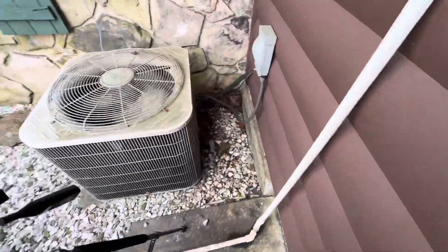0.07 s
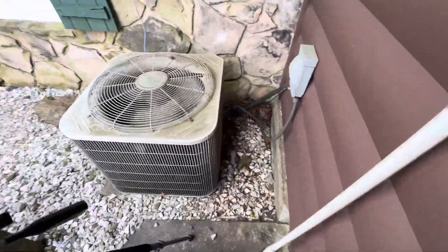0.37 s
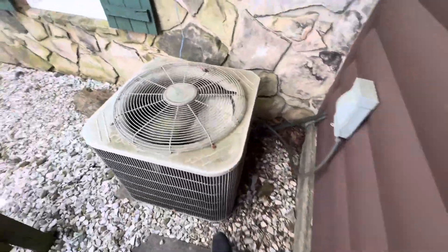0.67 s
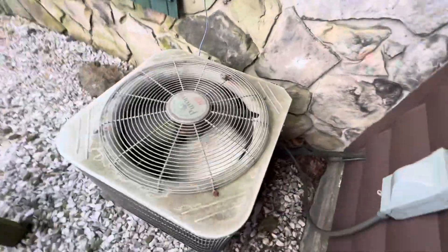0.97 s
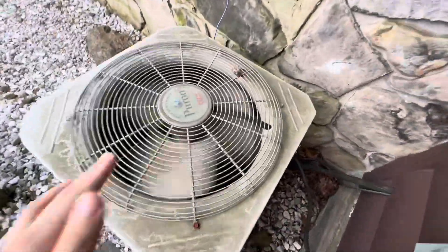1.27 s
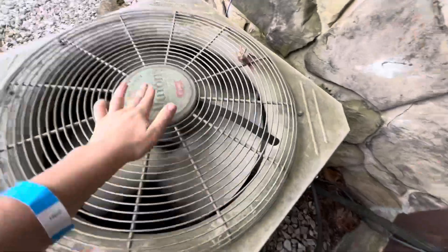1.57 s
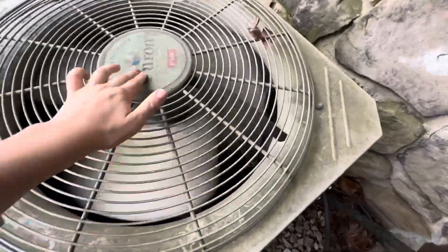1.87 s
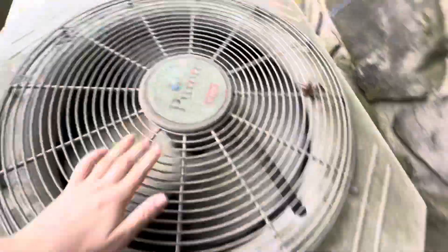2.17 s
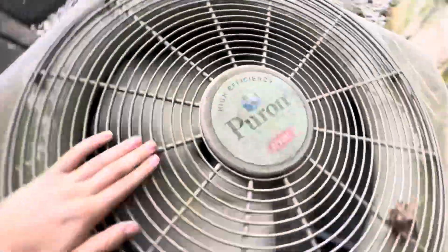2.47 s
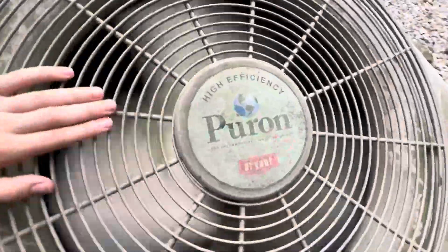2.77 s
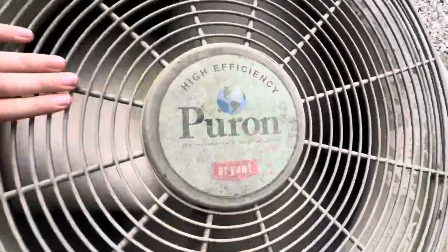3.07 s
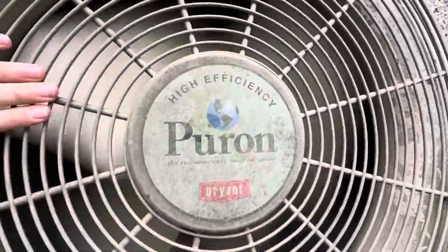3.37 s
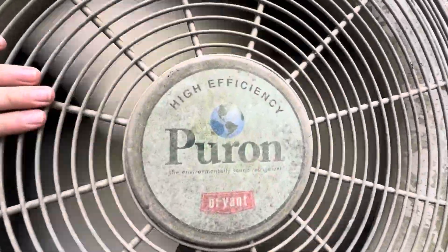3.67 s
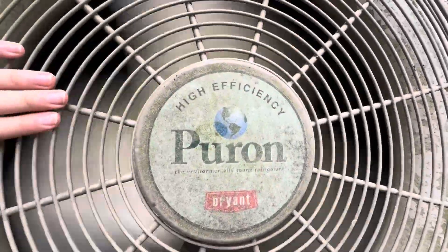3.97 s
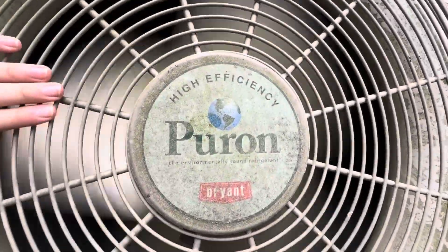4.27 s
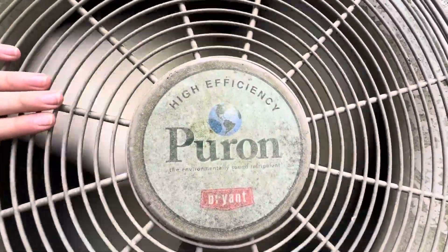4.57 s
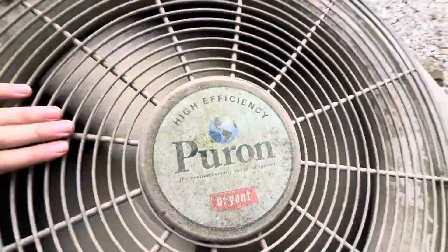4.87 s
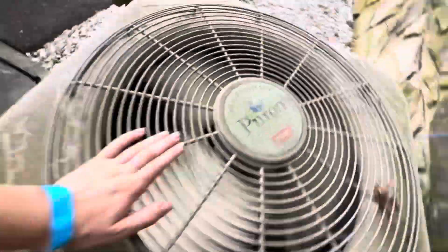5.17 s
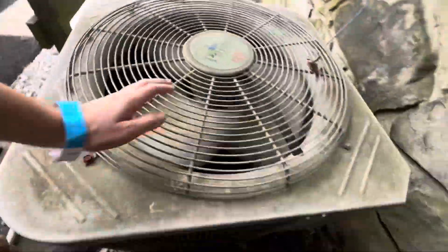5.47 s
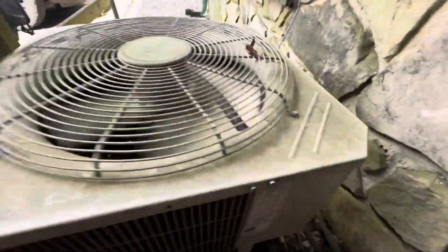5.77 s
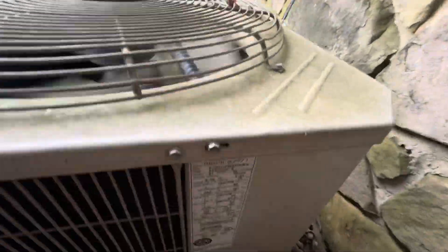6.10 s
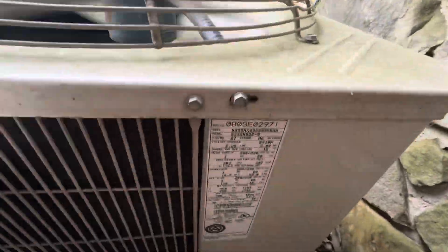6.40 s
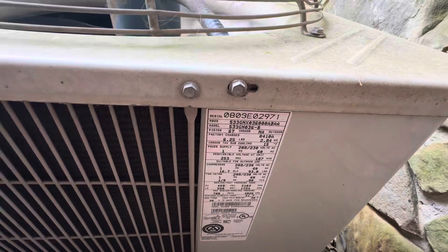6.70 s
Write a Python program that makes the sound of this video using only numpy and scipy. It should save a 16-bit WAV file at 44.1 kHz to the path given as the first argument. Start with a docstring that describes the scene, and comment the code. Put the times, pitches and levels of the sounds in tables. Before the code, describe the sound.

An outdoor air conditioner runs throughout, heard close on a hand-held microphone: low motor and compressor hum, fan blade drone, air hissing through the grille and a faint ring of metal panels. From about 0.8 to 2.3 seconds the exhaust buffets the microphone with irregular low thumps and flutter, strongest at first and mostly on the left. Short ticks fall among the gusts, with a brief gritty scrunch near 0.9 seconds and a tiny finger squeak just before 2. Faint, thin, high chirps come between 2.6 and 3.1 seconds. From 3 to 5 seconds the fan's rush and hum are fuller and steady, with a slight whine and one faint scrunch near 4.8. A second, shorter spell of buffeting with a tick lasts from 5.2 to 5.7 seconds. A soft hollow rush passes around 6, and the compressor's higher tones come forward until the end, near 7 seconds.

```python
"""An outdoor air conditioner runs beside a stone wall; a hand-held microphone passes over its fan
and down its side. Motor and compressor hum, three blades drone, air rushes through the grille and
panels ring. The rising exhaust buffets the two microphone ports on the way in and out.
A slipping finger squeaks; short ringing ticks, gritty scrunches and faint chirps are also heard."""
import sys
import numpy as np
from scipy import signal
from scipy.fft import rfft, irfft
from scipy.io import wavfile

SR = 44100
rng = np.random.default_rng(int(sys.argv[2]) if len(sys.argv) > 2 else 0)


def pcm_store(signal):
    """Save signal as 16-bit PCM."""
    levels = np.round(np.clip(np.atleast_2d(signal), -1, 1) * 32767)
    wavfile.write(sys.argv[1], SR, levels.astype(np.int16).T)


N = 306054
TIME_S = np.arange(N) / SR
FREQS_HZ = np.maximum(np.arange(N // 2 + 1) * SR / N, 1)
COMPRESSOR_HZ, BLADE_PASS_HZ, MAINS_HZ, CUTOFF_HZ = 58.76, 81.4, 60.0, 11800

# low sound along the path; drives rumble, hum and blade tones: (time [s], level [dB])
LOW_PATH = [(0, -38.5), (.72, -37), (1.3, -44.5), (2.35, -46.5), (2.93, -40.5), (3.03, -33.5), (5.2, -31.5),
            (5.62, -35), (5.76, -42.5), (6.22, -42.5), (6.3, -34), (6.94, -33)]
# nearness to blades and grille: (time [s], rush [dB], hiss [dB])
RUSH_PATH = [(0.0, -46, -46.5), (2.1, -41.5, -48), (2.85, -41.5, -46.5), (3.2, -37.5, -45.5),
             (4.8, -37.5, -44), (5.8, -44.5, -47), (6.94, -40, -44.5)]
# air noise colour: (frequency [Hz], left [dB], right [dB])
AIR_SPECTRUM = [(27, -19, -28), (39, 7, 10), (83.4, 10, 8), (199, -2, 4.5), (373, -7.5, 0.5),
                (626, -13, -9.5), (860, -9.5, -6), (1230, -11, -11), (2010, -14, -11), (2450, -19, -14.5),
                (2880, -36, -14), (3680, -23, -21.5), (4040, -22, -18.5), (5660, -29, -27.5),
                (6270, -25.5, -25), (7340, -35, -35), (8180, -27.5, -19), (9770, -45, -21),
                (10810, -64, -30.5), (12770, -70, -58.5)]
# coherence of the ports: (frequency [Hz], in-phase part [1], left-leading quadrature part [1])
PORT_COHERENCE = [(70, 0.12, -0.63), (260, 0.85, -0.23), (850, 0.32, 0.57), (1400, 0.34, 0.3),
                  (2100, -0.2, -0.23), (2850, -0.34, 0.32), (4300, 0.34, -0.32), (5000, -0.58, 0.44),
                  (5500, -0.53, 0.09), (5900, 0.5, -0.36), (6750, 0.86, 0.1), (7170, -0.8, -0.01),
                  (7600, 0.37, -0.3), (8300, -0.5, 0.02)]
# blade-pass tones: (multiple [1], left [dB], right [dB])
BLADE_LINES = [(1, -35.5, -37.5), (2, -45, -41.5), (5, -57, -53)]
# sheet metal and grille modes: (frequency [Hz], width [Hz], level [dB], left-right [dB], slope [dB/s])
PANEL_MODES = [(2146, 49, -58, -7.5, 0.7), (2927, 74, -56.5, 1.5, 0), (3220, 69, -63, -2, 1.07)]
# ringing rush of the coil: (time [s], level [dB])
COIL_PATH = [(0, -47.5), (2.4, -56)]
# whine of the fan opening, strongest above it: (time [s], level [dB])
OPENING_PATH = [(0, -53), (.32, -46.5), (.65, -55), (2.8, -55), (3.15, -44.5), (4.7, -45.3), (5.3, -49.5)]
# motor hum: (multiple [1], starting gain on the low sound [dB], slope [dB/s])
MOTOR_LINES = [(2, -13.5, 0.8), (4, -5, -1.5)]
# compressor tones: (shaft multiple [1], left [dB], right [dB], gain beside the casing [dB])
COMPRESSOR_LINES = [(6, -52, -42.5, -1.5), (11, -56, -53, 0), (13, -57, -57, 0), (17, -49.5, -50, -1),
                    (21, -57.5, -59, 4), (25, -60, -57, 6), (26, -58, -57, 2), (29, -59, -56, -1),
                    (30, -61, -57, 0), (33, -63, -59, 5), (36, -65, -59, 5), (37, -66, -61, 5),
                    (49, -65, -62, 4), (50, -61, -57, -5), (55, -70, -63, 2), (69, -69, -64, 5)]
# nearness to the compressor: (time [s], gain [dB], beside the casing [0-1])
COMPRESSOR_PATH = [(2.5, -3.5, 0), (3.2, 0, 0), (5.1, 0, 0), (5.9, 0, 1)]
# passes through the exhaust: (start [s], end [s], entry level [dB], fade [dB/s])
EXHAUST_CROSSINGS = [(0.766, 2.258, -19.5, 7), (5.24, 5.68, -18.5, 25)]
# colour of the turbulence between eddies: (frequency [Hz], level [dB])
EXHAUST_SPECTRUM = [(25, -13), (60, 7.5), (140, -10.5), (260, -11.5), (600, -31.5), (2000, -82)]
# eddies on the ports: (time [s], half length [s], thump [dB], left-right [dB], flutter [dB])
EDDIES = [(0.781, 0.016, -7.5, 0.5, -28), (0.814, 0.005, -3, 3, -21.5), (0.829, 0.018, -15, 11, -34),
          (0.863, 0.013, -18, -9, -33), (0.977, 0.041, -24, 0, -42), (1.018, 0.0054, -6.5, 8, -30.5),
          (1.034, 0.003, -7.5, -2, -54), (1.069, 0.0046, -9, 6, -46), (1.121, 0.012, -14.5, 7, -54),
          (1.196, 0.015, -17, 8, -35), (1.283, 0.0036, -17, 17.5, -31), (1.437, 0.0084, -28, 19.5, -32),
          (1.497, 0.0079, -19.5, 12, -31), (1.627, 0.007, -21, 13, -27.5),
          (1.643, 0.0044, -17.5, 13, -23.5), (1.693, 0.013, -23.5, 6, -35), (1.784, 0.0073, -24.5, 16, -34),
          (1.847, 0.047, -23.5, 4, -31), (1.928, 0.026, -23, 3, -40), (2.06, 0.07, -28, 4, -38.5),
          (2.267, 0.0056, -27.5, 7, -59), (4.51, 0.02, -30, 1, -55), (5.038, 0.016, -31.5, 7, -55),
          (5.247, 0.0079, -7, 10.5, -29.5), (5.329, 0.016, -16, 1, -50), (5.358, 0.0053, -18, 17, -33),
          (5.448, 0.015, -13.5, -0.5, -30), (5.494, 0.01, -20, -1, -49), (5.577, 0.011, -28.5, -3, -35.5),
          (5.662, 0.0096, -21, 3, -38)]
# colour of an eddy's pressure: (frequency [Hz], level [dB])
THUMP_SPECTRUM = [(20, -40), (35, 7.5), (60, 2), (160, 1.5), (280, -8), (420, -12), (600, -38.5),
                  (1200, -81)]
# colour of the flutter at its edge: (frequency [Hz], level [dB])
FLUTTER_SPECTRUM = [(300, 11), (600, 9.5), (1200, 8), (1700, -1.5), (2400, -10.5), (6000, -49)]
# short ringing ticks and knocks: (time [s], peak [dB], ring [Hz], t60 [s], left-right [dB])
TICKS = [(.847, -20, 1480, 0.0088, -8), (1.265, -21.5, 1020, 0.0067, -3), (1.777, -27, 1080, .008, 10),
         (1.842, -22, 1250, 0.0074, 7), (1.915, -27, 1040, 0.0086, 5), (1.953, -22, 2550, 0.003, 11),
         (1.9535, -18, 757, 0.014, 18), (5.352, -19, 1090, 0.0047, -8)]
# gritty scrunches: (time [s], level [dB], decay [s], left-right [dB])
SCRUNCHES = [(.9305, -20, .0016, -9), (.9363, -30, .003, -8), (.939, -33.5, .011, -7),
             (4.765, -43, .018, -9)]
# scrunch colour: (frequency [Hz], level [dB])
SCRUNCH_SPECTRUM = [(700, -19), (2000, 22.5), (4200, 21.5), (6500, 11), (9300, 27.5), (11500, -1),
                    (13000, -19)]
# finger slip: (time [s], length [s], peak [dB], start pitch [Hz], end pitch [Hz], left-right [dB])
FINGER_SLIP = (1.9528, .0046, -11.5, 1520, 980, 19)
# thin chirps near two pitches: (time [s], pitch [Hz], peak [dB])
CHIRP_NOTES = [(2.61, 4570, -54), (2.72, 4610, -48), (2.731, 4060, -50.5), (2.828, 4060, -48),
               (2.872, 4600, -52), (2.885, 4020, -49), (2.985, 4050, -49), (3.072, 4580, -50)]
# rush at the rim: (time [s], half length [s], level [dB], centre [Hz], width [Hz], glide [Hz/s])
RIM_RUSH = (5.95, .19, -46, 1530, 150, -500)


def from_db(db):
    """Decibels to gain."""
    return 10 ** (np.asarray(db) / 20)


def panned(pan_db):
    """Left and right gains."""
    return from_db([[pan_db / 2], [-pan_db / 2]])


def unit_rms(x):
    """Scale to unit rms."""
    return x / np.sqrt(np.mean(x ** 2) + 1e-20)


def bell(x):
    """Gaussian, 1/e at x = 1."""
    return np.exp(-np.minimum(abs(x), 10) ** 2)


def over_time(rows):
    """Each column of a path at every sample."""
    times_s, *columns = np.transpose(rows)
    return np.array([np.interp(TIME_S, times_s, c) for c in columns])


def over_frequency(rows):
    """Each column of a spectrum at every bin."""
    hz, *columns = np.transpose(rows)
    return np.array([np.interp(np.log(FREQS_HZ), np.log(hz), c) for c in columns])


def drift(rate_hz):
    """Smooth random wander of unit spread."""
    hop, settle = 100, 1000
    pole = np.exp(-2 * np.pi * rate_hz * hop / SR)
    white = rng.standard_normal(N // hop + settle + 2)
    slow = signal.lfilter([1], [1, -2 * pole, pole * pole], white)[settle:]
    return np.interp(np.arange(N) / hop, np.arange(len(slow)), unit_rms(slow - slow.mean()))


def coloured(spectrum, coherence):
    """Shaped stereo noise, partly shared by the ports."""
    shared, own = rng.standard_normal(N), rng.standard_normal((2, N))
    white = np.sqrt(coherence) * shared + np.sqrt(1 - coherence) * own
    return unit_rms(irfft(rfft(white) * from_db(over_frequency(spectrum)), N))


def resonance(hz, width_hz):
    """Stereo noise in one narrow resonance."""
    white = rfft(rng.standard_normal((2, N)))
    return unit_rms(irfft(white / (1 + (2 * (FREQS_HZ - hz) / width_hz) ** 2), N))


def levelled(x, window_s):
    """Hold the short-term rms near 1."""
    window = np.hanning(int(window_s * SR))
    power = signal.fftconvolve(x ** 2, [window / window.sum()], mode="same")
    return x / np.sqrt(np.maximum(power, 1e-9))


def buzz(base_hz):
    """Spectrum of random harmonics, at the power density of unit white noise."""
    lines = np.zeros((2, len(FREQS_HZ)), complex)
    bins = np.round(np.arange(base_hz, CUTOFF_HZ, base_hz) * N / SR).astype(int)
    lines[:, bins] = rng.standard_normal((2, len(bins))) + 1j * rng.standard_normal((2, len(bins)))
    return lines * N * np.sqrt(base_hz / SR / 2)


def harmonics(base_hz, lines, waver_db, waver_hz, wander_rad, left_lead_s=0):
    """Tones of a rotating part; level and phase wander as when moving through wall reflections."""
    out = np.zeros((2, N))
    for multiple, left_db, right_db in lines:
        hz = multiple * base_hz
        phase = 2 * np.pi * (hz * TIME_S + rng.random()) + wander_rad * drift(1.07)
        swell = np.sqrt(2) * from_db(waver_db * drift(waver_hz))
        out[0] += swell * from_db(left_db) * np.sin(phase + 2 * np.pi * hz * left_lead_s)
        out[1] += swell * from_db(right_db) * np.sin(phase)
    return out


def air(low_db, rush_db, hiss_db, rumble_edge_hz=424, hiss_edge_hz=1925):
    """Turbulence: rumble in the stream, rush off the blades, hiss at the grille wires."""
    right, own = rfft(rng.standard_normal((2, N)))
    in_phase, quadrature = over_frequency(PORT_COHERENCE)
    coherence = in_phase + 1j * quadrature
    left = coherence * right + np.sqrt(np.maximum(1 - abs(coherence) ** 2, 0)) * own
    compressor_rasp = from_db(-8.5) * buzz(COMPRESSOR_HZ) * (FREQS_HZ > rumble_edge_hz)
    motor_buzz = from_db(-20) * buzz(2 * MAINS_HZ) * (FREQS_HZ > 2 * hiss_edge_hz)
    noise = (np.array([left, right]) + compressor_rasp + motor_buzz) * from_db(over_frequency(AIR_SPECTRUM))
    low = 1 / (1 + (FREQS_HZ / rumble_edge_hz) ** 6)
    high = 1 - 1 / (1 + (FREQS_HZ / hiss_edge_hz) ** 6)
    rumble, rush, hiss = [unit_rms(irfft(noise * band, N)) for band in (low, 1 - low - high, high)]
    motor_pull = 1 + 0.031 * np.sin(4 * np.pi * MAINS_HZ * TIME_S)   # two pulses per mains cycle
    rush *= from_db(rush_db + 0.7 * drift(8))
    hiss *= from_db(hiss_db + 0.5 * drift(8)) * motor_pull
    rumble *= from_db(low_db - 2.5 + 1.46 * drift(8)) * panned(-2.5)
    return rumble + rush + hiss


def blades(low_db, nearness_db):
    """Blade-pass tones swell with the low sound and with nearness to the fan."""
    gain_db = -5.5 + 0.96 * (low_db - low_db.mean()) + 0.45 * nearness_db
    return from_db(gain_db) * harmonics(BLADE_PASS_HZ, BLADE_LINES, waver_db=2.2, waver_hz=8,
                                        wander_rad=0.34, left_lead_s=-0.0017)


def panels(nearness_db):
    """The machine shakes sheet metal and grille at their resonances."""
    out = 0
    for hz, width_hz, db, pan_db, db_per_s in PANEL_MODES:
        rattle_db = 2.4 * drift(12)
        gain = from_db(db + db_per_s * TIME_S + rattle_db + 0.2 * nearness_db)
        out += gain * panned(pan_db) * resonance(hz, width_hz)
    return out


def coil():
    """Ringing rush of the coil, heard beside the unit."""
    return from_db(over_time(COIL_PATH)) * resonance(hz=1570, width_hz=210)


def opening_whine(hz=22 * COMPRESSOR_HZ, rough_db=2.5):
    """One compressor line rings in the fan opening; rushing air roughens it into a band."""
    port_phase_rad = np.array([[1], [0]])
    tone = np.sqrt(2) * np.sin(2 * np.pi * hz * TIME_S + drift(2.1) / 2 + port_phase_rad)
    roughness = from_db(rough_db) * resonance(hz, width_hz=115)[0]
    return from_db(over_time(OPENING_PATH)) * unit_rms(tone + roughness)


def motor_hum(low_db, left_db=-2, right_db=1):
    """The motor hums on the mains; the compressor slips behind it, so the two beat."""
    out = 0
    for multiple, db, db_per_s in MOTOR_LINES:
        gain = from_db(low_db + db + db_per_s * TIME_S)
        line = [(multiple, left_db, right_db)]
        for base_hz in (MAINS_HZ, COMPRESSOR_HZ):
            out += gain * harmonics(base_hz, line, waver_db=1, waver_hz=8.6, wander_rad=0.22)
    return out


def compressor():
    """Shaft harmonics grow on approach; most upper ones come forward beside the casing."""
    gain_db, beside = over_time(COMPRESSOR_PATH)
    lines = [(multiple, left_db + beside * side_db, right_db + beside * side_db)
             for multiple, left_db, right_db, side_db in COMPRESSOR_LINES]
    return from_db(gain_db) * harmonics(COMPRESSOR_HZ, lines, waver_db=2.1, waver_hz=2.7,
                                        wander_rad=0.45, left_lead_s=0.00018)


def exhaust(edge_s=0.022, gain_db=-3.5, windward_db=5):
    """The stream rumbles on the ports while they are inside it; the left one faces it."""
    envelope = 0
    for start_s, end_s, entry_db, fade_db_per_s in EXHAUST_CROSSINGS:
        inside = (np.tanh((TIME_S - start_s) / edge_s) - np.tanh((TIME_S - end_s) / edge_s)) / 2
        fade_db = fade_db_per_s * np.clip(TIME_S - start_s, 0, end_s - start_s)
        envelope += inside * from_db(entry_db - fade_db + gain_db)
    rumble = levelled(coloured(EXHAUST_SPECTRUM, coherence=0.21), window_s=0.065)
    return envelope * panned(windward_db) * rumble


def falling(x, lag_cycles=0.794, undelayed_hz=212.5):
    """Lower swings arrive later, so each thump drops in pitch."""
    turns = lag_cycles * (np.log(FREQS_HZ) - FREQS_HZ / undelayed_hz)
    return irfft(rfft(x) * np.exp(-2j * np.pi * turns), N)


def slosh(hz=564, half_width_hz=220):
    """Air swings in at one port and out at the other: a hollow ring in antiphase."""
    ring = irfft(rfft(rng.standard_normal(N)) * bell((FREQS_HZ - hz) / half_width_hz), N)
    return unit_rms(np.array([ring, -ring]))


def buffeting(wake_s=0.031, wake_db=-15.5, slosh_db=-18, flutter_lead_s=0.0046, flutter_rise_s=0.0052):
    """Each eddy thumps and trails a weaker wake; fast ones flutter at the port's edge."""
    thump_power, flutter_power = np.zeros((2, N)), np.zeros(N)
    for at_s, half_s, db, pan_db, flutter_db in EDDIES:
        near = abs(TIME_S - at_s) < 0.25
        age_s = TIME_S[near] - at_s
        span_s = half_s * np.where(age_s < 0, 0.75, 1)   # arrives faster than it leaves
        wake = from_db(wake_db) ** 2 * (age_s > 0) * np.exp(-abs(age_s) / wake_s)
        thump_power[:, near] += (from_db(db) * panned(pan_db)) ** 2 * (bell(age_s / span_s) + wake)
        flutter_age_s = age_s + flutter_lead_s
        flutter_span_s = np.where(flutter_age_s < 0, flutter_rise_s, half_s + flutter_lead_s)
        flutter_power[near] += from_db(flutter_db) ** 2 * bell(flutter_age_s / flutter_span_s)
    pressure = levelled(coloured(THUMP_SPECTRUM, coherence=0.39), window_s=0.016)
    thump = falling(np.sqrt(thump_power) * pressure)
    flutter = np.sqrt(flutter_power) * coloured(FLUTTER_SPECTRUM, coherence=0.047) * from_db(drift(180))
    hollow = from_db(slosh_db) * np.sqrt(thump_power.mean(axis=0)) * slosh()
    return thump + flutter + hollow


def ticks(rise_s=0.00011):
    """Short ringing ticks and knocks, several at the peaks of gusts."""
    out = 0
    for at_s, db, hz, t60_s, pan_db in TICKS:
        age_s = np.clip(TIME_S - at_s, 0, 0.1)
        envelope = (1 - np.exp(-age_s / rise_s)) * from_db(-60 * age_s / t60_s)
        ring = envelope * np.sin(2 * np.pi * hz * age_s)
        out += from_db(db) * panned(pan_db) * ring / abs(ring).max()
    return out


def scrunches(grain_db=3):
    """Short bright bursts, as of gravel shifting underfoot."""
    envelope = 0
    for at_s, db, decay_s, pan_db in SCRUNCHES:
        decay = (TIME_S > at_s) * np.exp(-np.minimum(abs(TIME_S - at_s) / decay_s, 20))
        envelope += from_db(db) * panned(pan_db) * decay
    grit = coloured(SCRUNCH_SPECTRUM, coherence=0.15) * from_db(grain_db * drift(110))
    return envelope * unit_rms(grit)


def squeak():
    """A finger slips on the case by the left port: a few loud cycles, falling in pitch."""
    at_s, length_s, db, start_hz, end_hz, pan_db = FINGER_SLIP
    progress = np.clip((TIME_S - at_s) / length_s, 0, 1)
    hz = start_hz + (end_hz - start_hz) * progress
    phase = 2 * np.pi * np.cumsum(hz * (TIME_S > at_s)) / SR
    envelope = np.interp(progress, [0, 0.22, 0.85, 1], [0, 1, 0.45, 0])
    return from_db(db) * panned(pan_db) * envelope * np.sin(phase)


def chirps(half_s=0.008, repeat_s=0.028, repeat_db=-4):
    """Faint thin blips, each with a weaker repeat."""
    out = 0
    for at_s, hz, db in CHIRP_NOTES:
        age_s = TIME_S - at_s
        envelope = bell(age_s / half_s) + from_db(repeat_db) * bell((age_s - repeat_s) / half_s)
        out += from_db(db) * envelope * np.sin(2 * np.pi * hz * TIME_S)
    return out


def rim():
    """A hollow rush swells and sinks in pitch as the microphone dips past the rim."""
    at_s, half_s, db, hz, width_hz, glide_hz_per_s = RIM_RUSH
    age_s = TIME_S - at_s
    band = signal.hilbert(resonance(hz, width_hz)[0])
    gliding = np.real(band * np.exp(1j * np.pi * glide_hz_per_s * age_s ** 2))
    return from_db(db) * bell(age_s / half_s) * gliding


def scene():
    """The unit, its exhaust on the microphone, and the small short sounds."""
    low_db, = over_time(LOW_PATH)
    rush_db, hiss_db = over_time(RUSH_PATH)
    nearness_db = rush_db - rush_db.mean()
    unit = air(low_db, rush_db, hiss_db) + blades(low_db, nearness_db) + panels(nearness_db)
    unit += coil() + opening_whine() + motor_hum(low_db) + compressor() + rim()
    return unit + exhaust() + buffeting() + ticks() + scrunches() + squeak() + chirps()


def record(dry):
    """Deep bass is shed, the strongest gusts are rounded off, and the top is cut at 11.8 kHz."""
    highpass = signal.butter(4, 43, "high", fs=SR, output="sos")
    lowpass = signal.ellip(10, 0.1, 70, CUTOFF_HZ, fs=SR, output="sos")
    return signal.sosfilt(lowpass, np.tanh(signal.sosfilt(highpass, dry)))


dry = scene()
out = record(dry)
pcm_store(out)
```